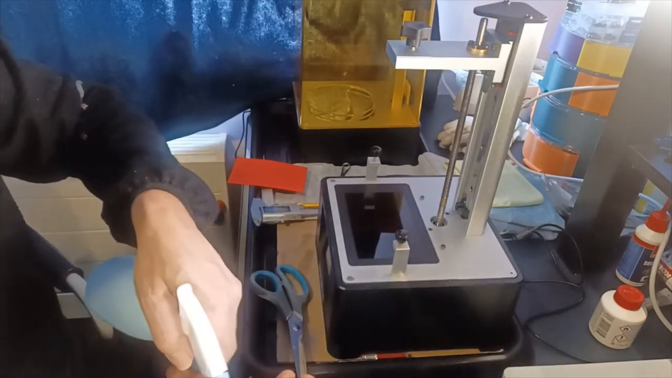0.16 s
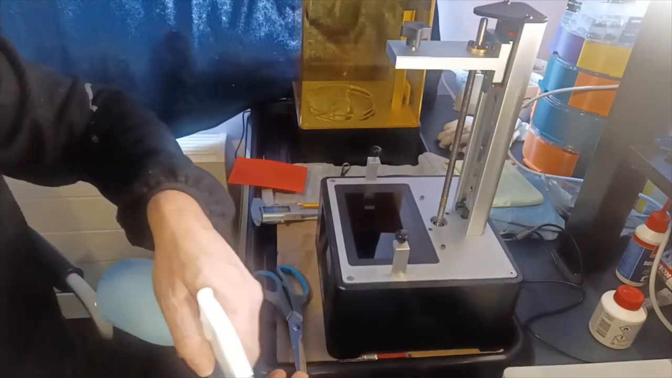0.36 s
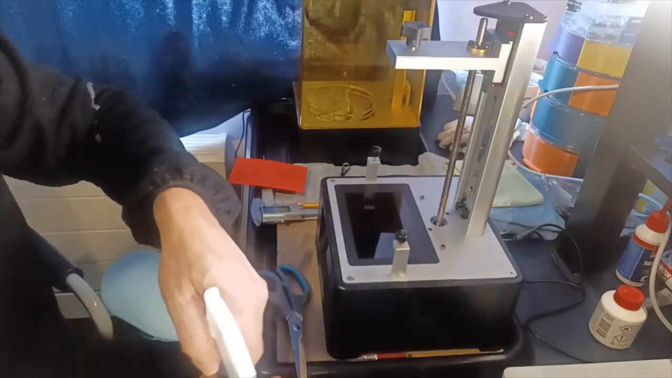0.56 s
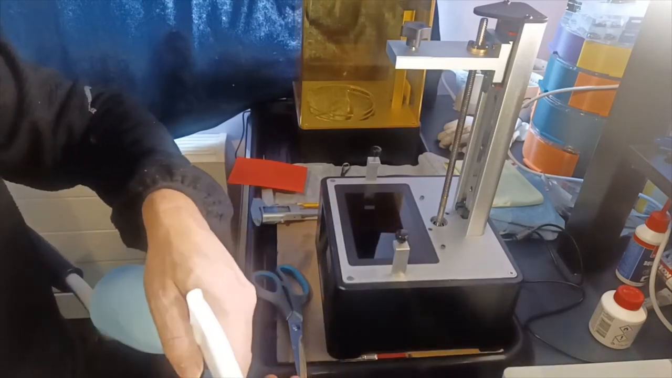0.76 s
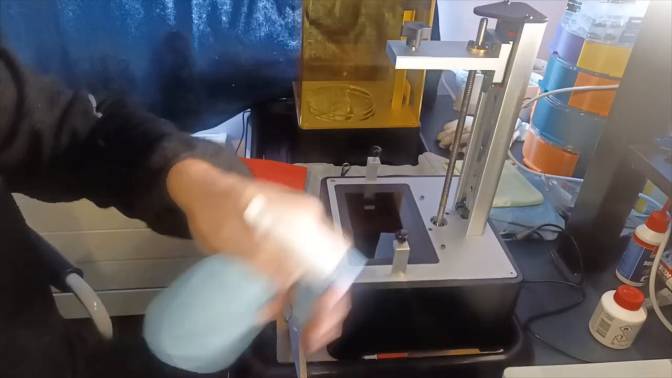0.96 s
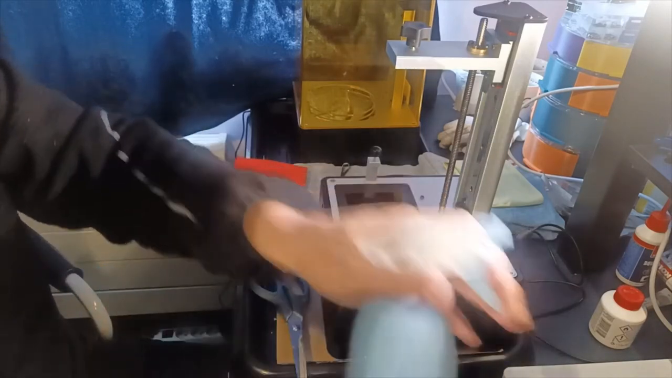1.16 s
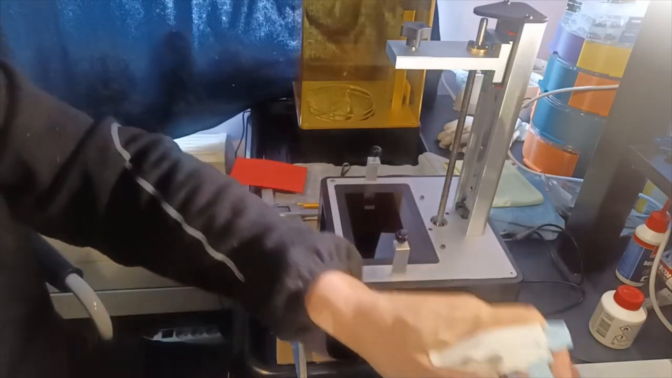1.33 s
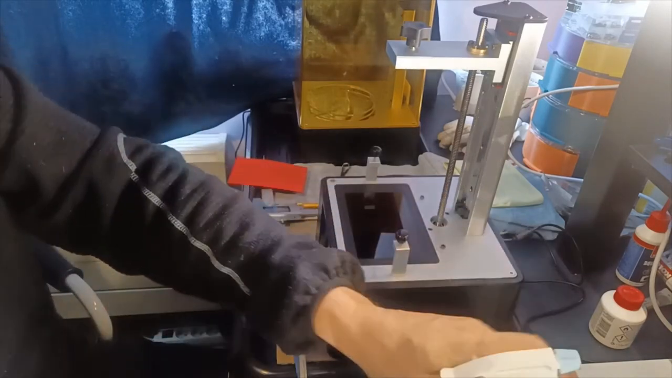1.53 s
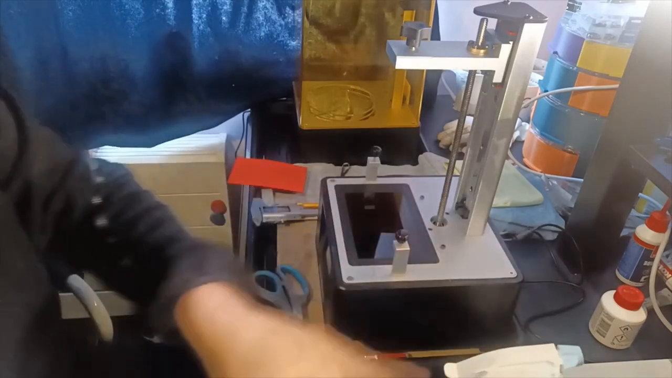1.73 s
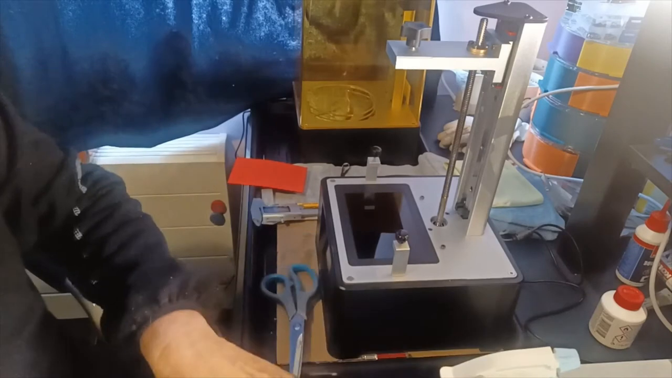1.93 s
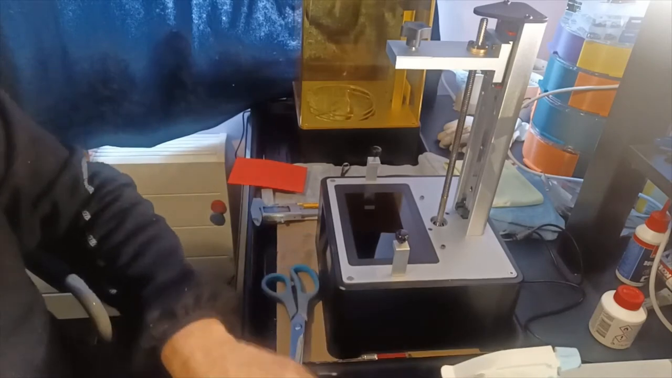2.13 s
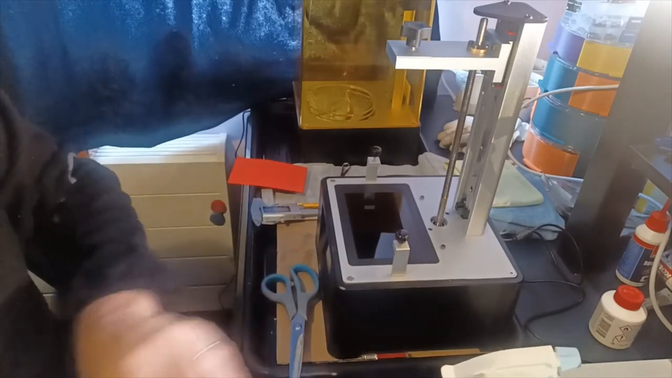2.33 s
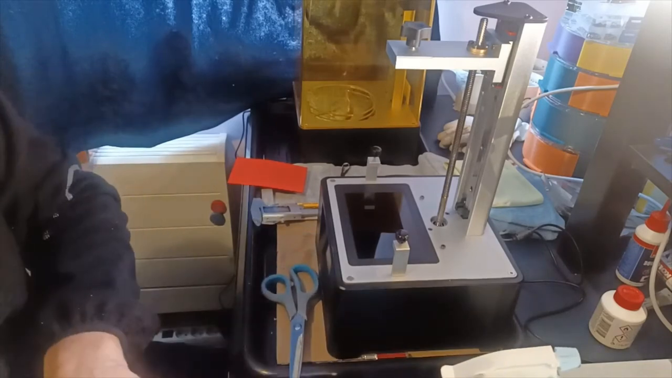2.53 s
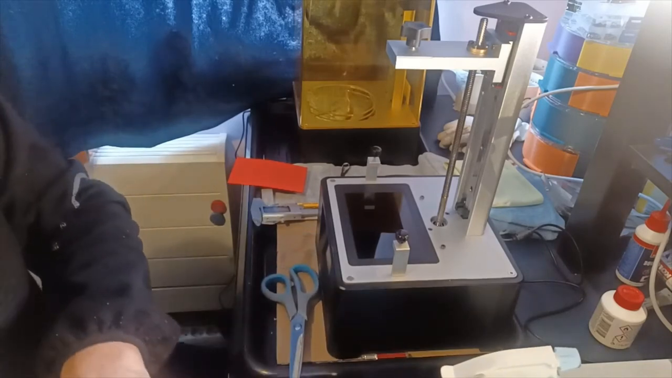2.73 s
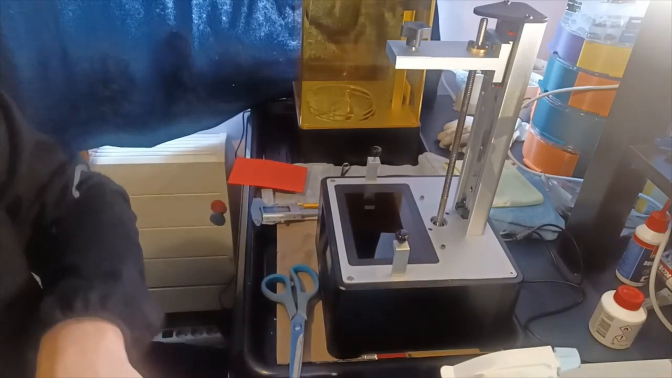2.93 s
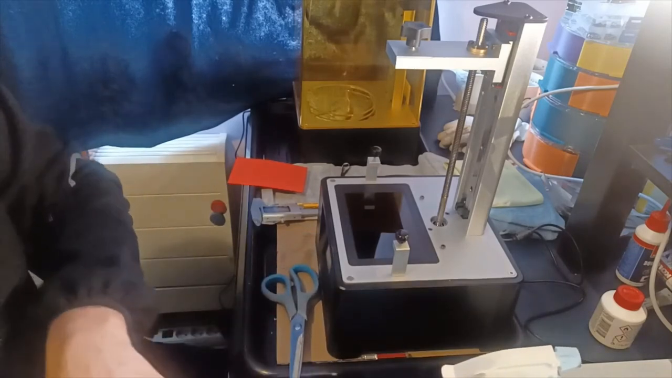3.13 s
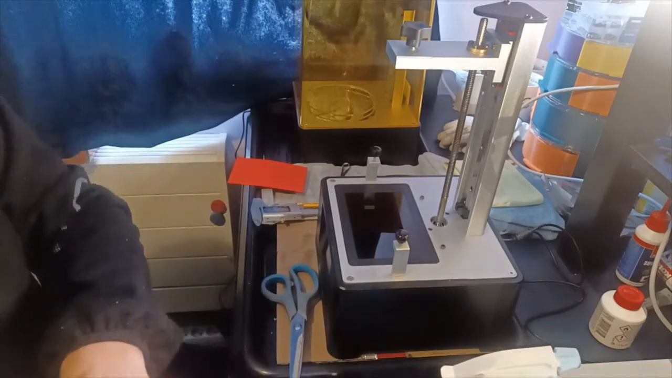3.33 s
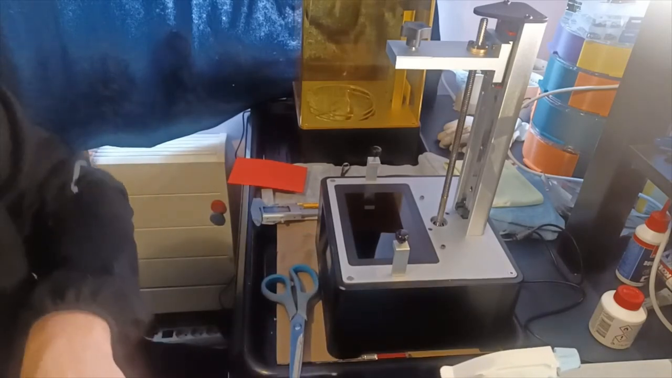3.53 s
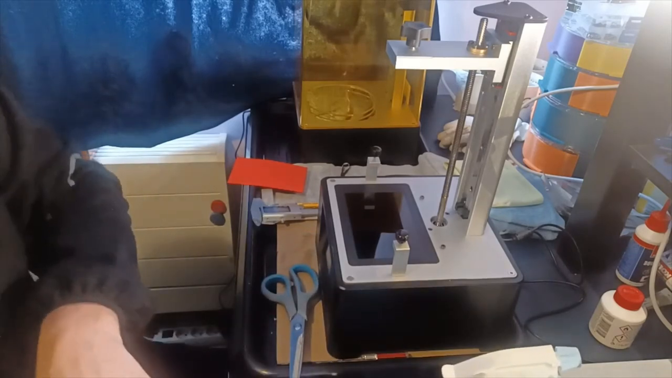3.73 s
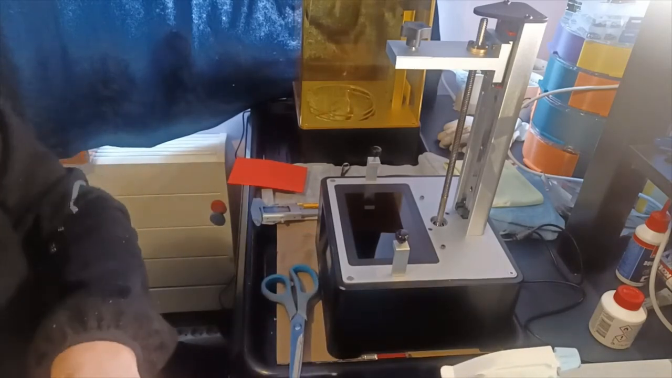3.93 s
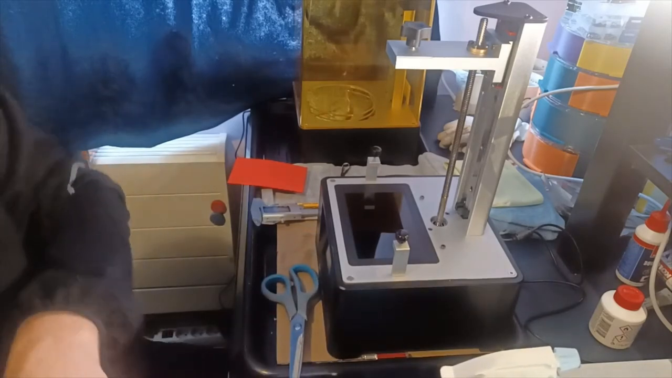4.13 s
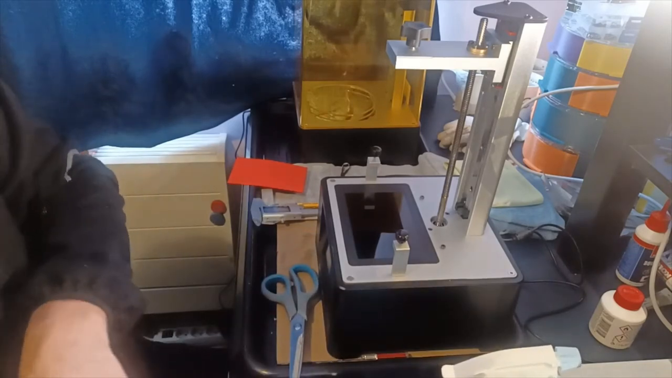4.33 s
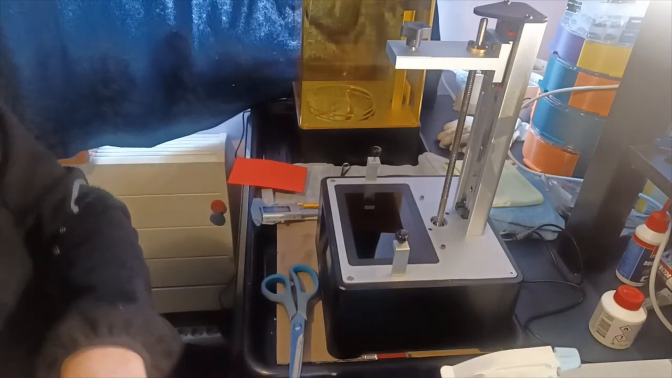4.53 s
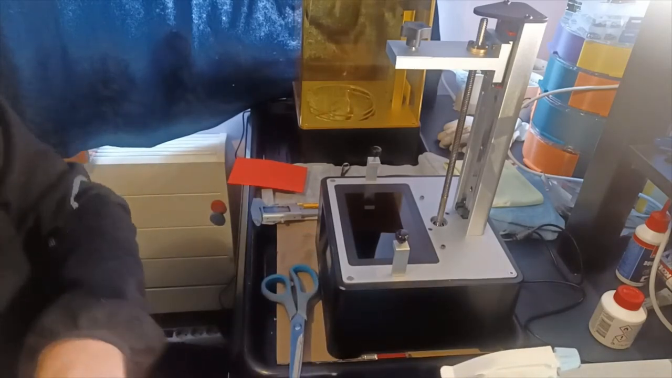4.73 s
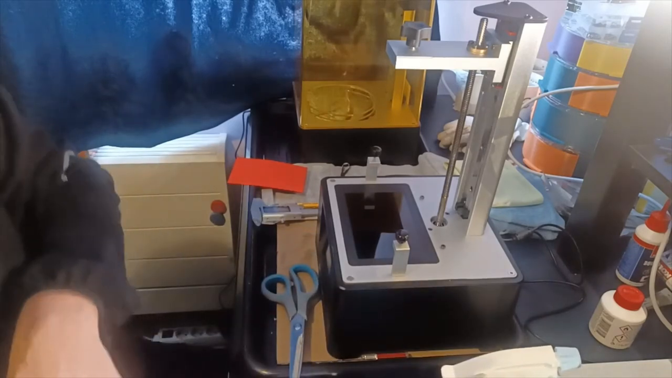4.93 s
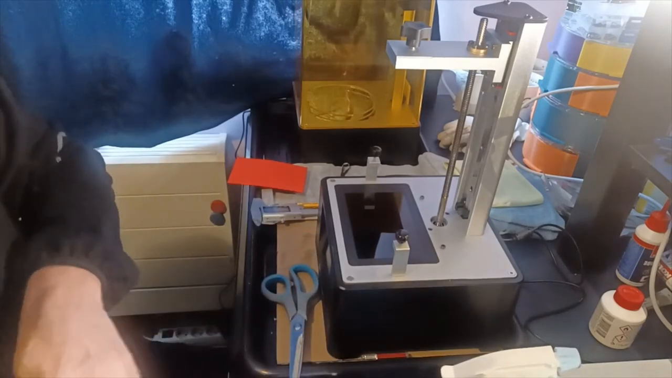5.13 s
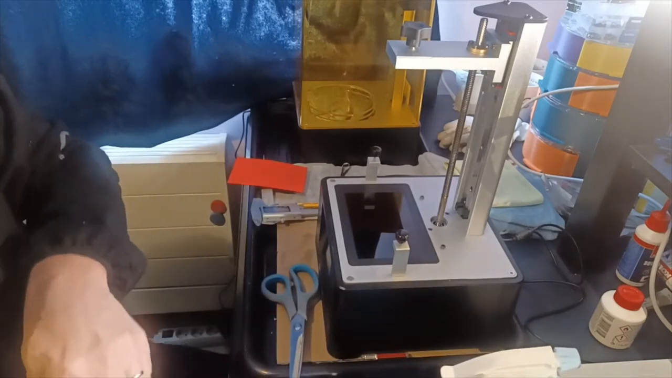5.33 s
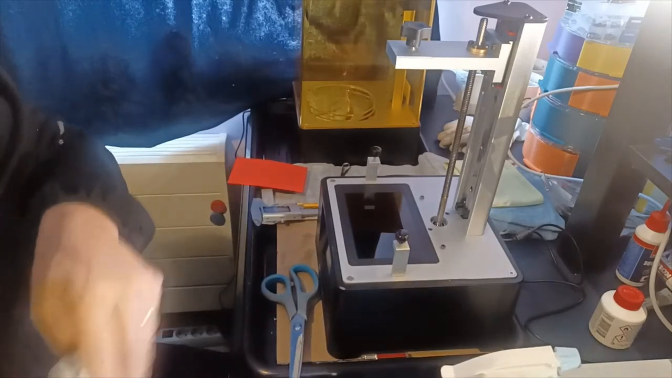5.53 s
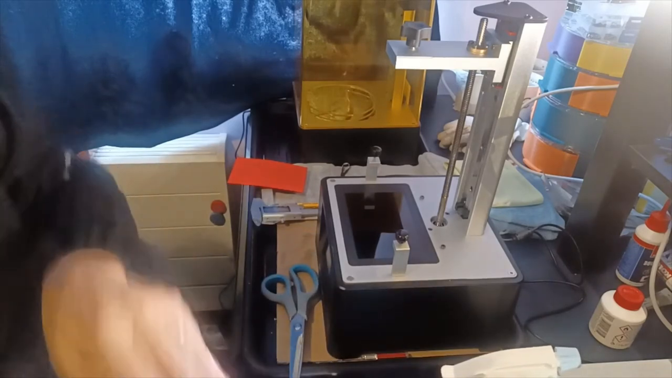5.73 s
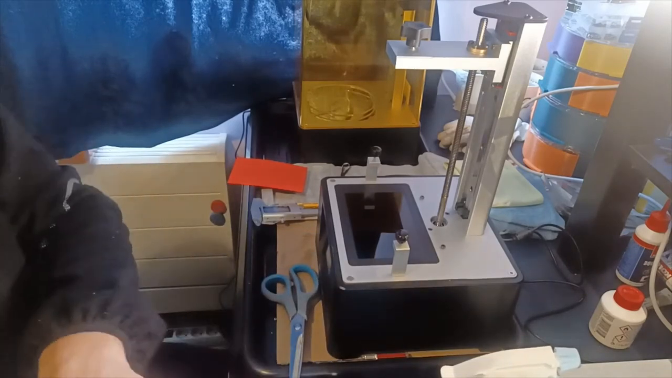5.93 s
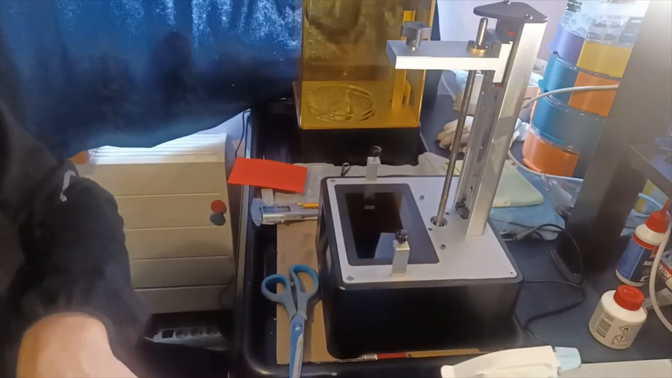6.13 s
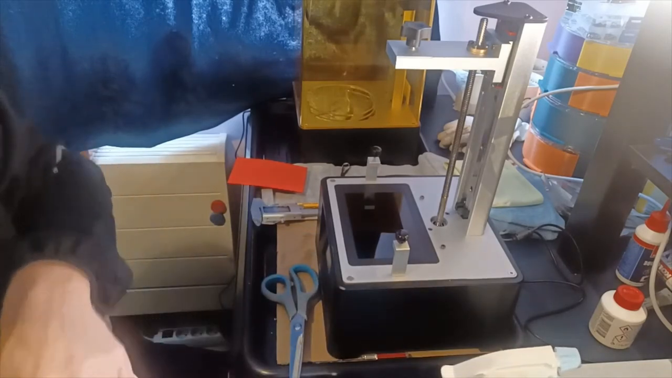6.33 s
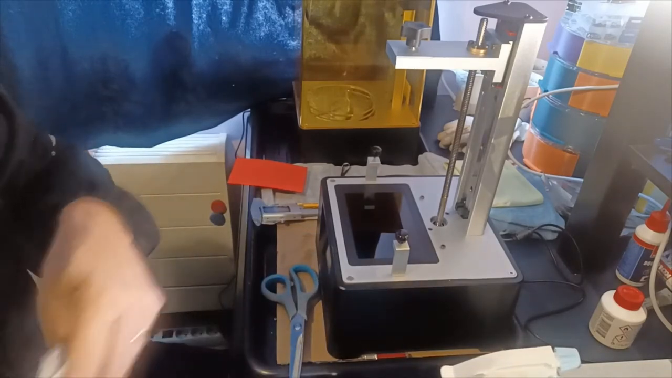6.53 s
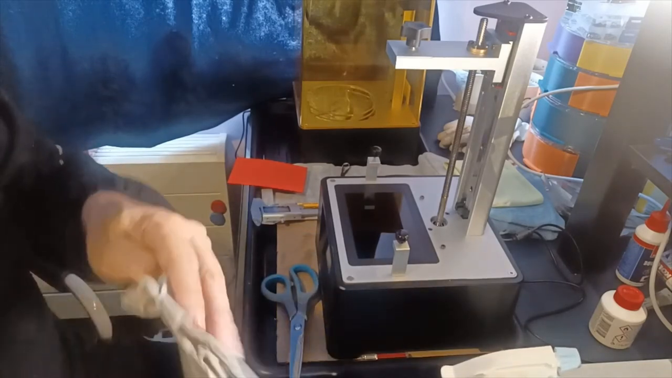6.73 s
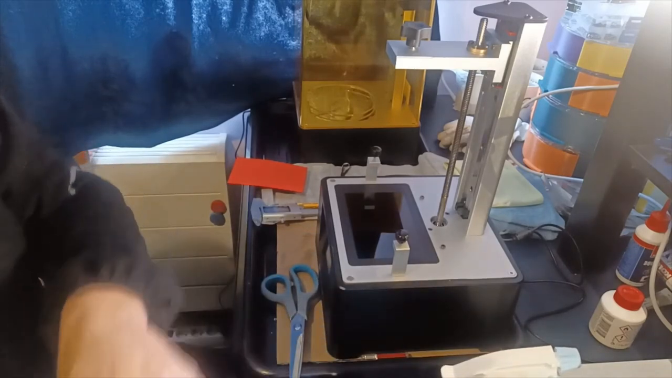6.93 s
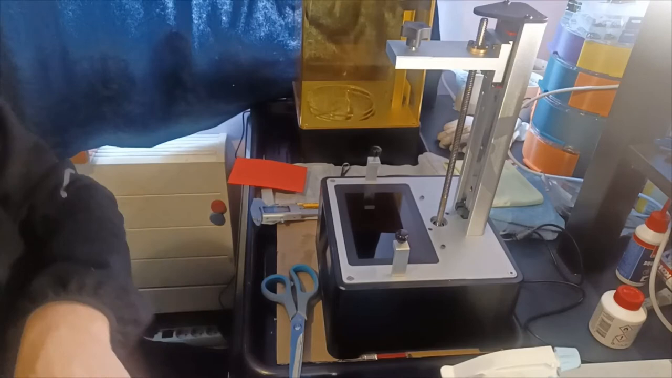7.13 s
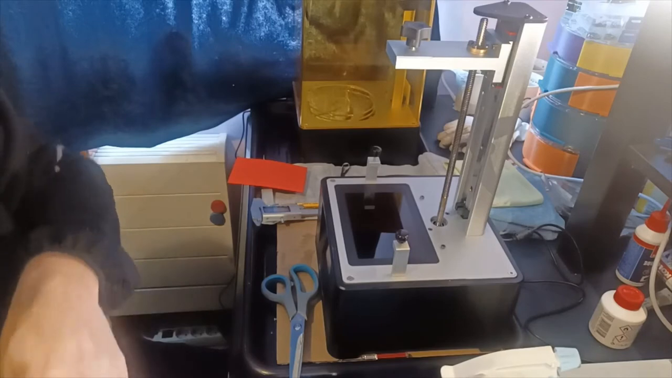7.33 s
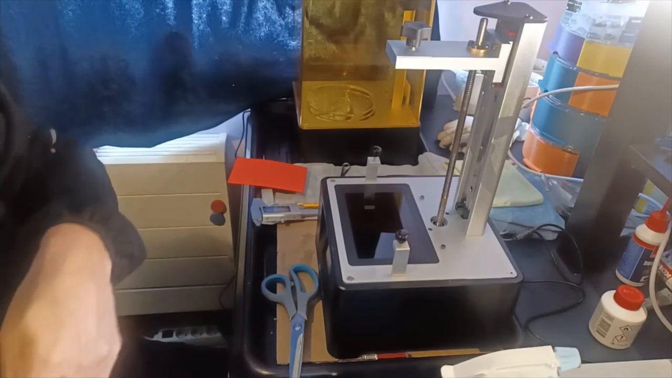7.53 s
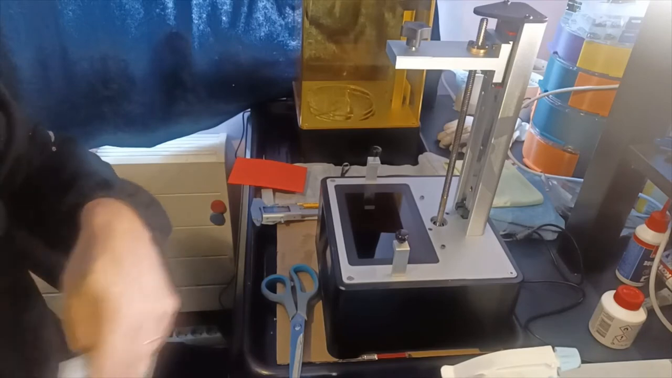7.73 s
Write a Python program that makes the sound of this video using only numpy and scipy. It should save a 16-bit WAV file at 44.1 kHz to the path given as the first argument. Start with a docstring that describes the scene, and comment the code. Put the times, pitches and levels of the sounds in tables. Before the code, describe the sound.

In a very quiet indoor workspace, a head-worn microphone picks up a brief squirt from a plastic spray bottle and a few trigger clicks. The loudest sound follows: the bottle knocks down on a hollow desk, wobbles and scuffs, with a light rattle of small objects. The rest is soft, uneven rustling of cloth being handled close by, dotted with light clicks and taps.

```python
"""A short grainy squeak and a few clicks: a spray bottle's trigger is squeezed and let go. The bottle lands on
a hollow desk and rocks; each blow rings desk and bottle and rattles loose things. Hands then work with cloth
just under a head-worn camera: slipping fibres rustle softly among small ticks and knocks. The room is very
quiet; two microphone ports hear it all."""
import sys
import numpy as np
from scipy import signal
from scipy.fft import rfft, irfft
from scipy.io import wavfile
from scipy.ndimage import uniform_filter1d

SR = 44100
rng = np.random.default_rng(int(sys.argv[2]) if len(sys.argv) > 2 else 0)


def persist_wave(psi):
    """Save psi, clipped to +-1, as 16-bit WAV."""
    counts = np.round(np.clip(psi, -1, 1) * 32767).astype(np.int16)
    wavfile.write(sys.argv[1], SR, np.atleast_2d(counts).T)


N = 342877
PORT_HZ, PORT_WIDTH_HZ = 7280, 1600  # resonance of the microphone ports
LAG_SAMPLES = 5  # the right port hears this much later


def undb(db):
    """Decibels to gain."""
    return 10 ** (np.asarray(db) / 20)


def unit(x):
    """Scale to rms 1."""
    return x / np.sqrt(np.mean(x ** 2))


def band(x, hz, width_hz):
    """Two-pole resonance, gain 1 at the centre."""
    return signal.lfilter(*signal.iirpeak(hz, hz / width_hz, fs=SR), x)


def track(rows, rest):
    """Columns of a breakpoint table at every sample; rest outside it."""
    times, *columns = np.transpose(rows)
    return [np.interp(np.arange(N) / SR, times, c, left=rest, right=rest) for c in columns]


def fall(t, t60):
    """Exponential decay of 60 dB in t60 seconds."""
    return np.exp(-np.log(1000) * t / t60)


def ring_modes(modes, t):
    """One dying sine for each row of pitch_hz, level_db, t60_s."""
    return np.array([undb(db) * fall(t, t60) * np.sin(2 * np.pi * hz * t) for hz, db, t60 in modes])


def port_noise(n, alike):
    """Stereo noise: the fraction alike of its power is common to both ports, later on the right."""
    shared, own = rng.standard_normal(n), rng.standard_normal((2, n))
    return np.sqrt(alike) * np.array([shared, np.roll(shared, LAG_SAMPLES)]) + np.sqrt(1 - alike) * own


def grains(rate_hz, spread_db):
    """Uneven gain of many tiny slips, rms 1."""
    step = int(SR / rate_hz)
    sizes = undb(spread_db * rng.exponential(size=N // step + 1))
    return unit(uniform_filter1d(np.repeat(sizes, step)[:N], step))


def add(out, start_s, piece):
    """Mix a piece in at start_s."""
    i = int(start_s * SR)
    out[..., i:i + piece.shape[-1]] += piece[..., :N - i]


def room_tone():
    """A faint steady bed of air and electronics; its rumble is partly shared by the ports."""
    curve_hz = [12, 30, 70, 140, 300, 700, 1600, 3200, 8000, 16000]
    curve_db = [0, -6.5, -16, -25, -24, -29, -31.5, -31, -37.5, -37]
    hz = np.maximum(np.fft.rfftfreq(N, 1 / SR), 1)
    colour = undb(np.interp(np.log(hz), np.log(curve_hz), curve_db))
    alike = 0.21 / (1 + (hz / 900) ** 2)
    shared, own = rfft(rng.standard_normal(N)), rfft(rng.standard_normal((2, N)))
    spectrum = colour * (np.sqrt(alike) * shared + np.sqrt(1 - alike) * own)
    return undb(-65) * unit(irfft(spectrum, N))


def stroke_envelopes():
    """Gains of hiss, weave and folds: each hand stroke rises, holds and fades; overlaps add in power."""
    # strokes of cloth and skin: full_level_at_s, rise_s, hold_s, fade_s, hiss_db, weave_db, folds_db
    strokes = [(0.061, 0.31, 0.15, 0.069, -69, -53, -55), (0.485, 0.034, 0.0088, 0.088, -47, -48.5, -50.5),
               (0.614, 0.059, 0.069, 0.13, -81, -71, -64), (0.912, 0.018, 0.014, 0.053, -80, -55.5, -77),
               (1.003, 0.06, .08, 0.26, -77, -75, -81), (1.202, 0.13, 0.15, 0.092, -73.5, -69, -78),
               (1.567, 0.071, 0.097, 0.17, -63.5, -65.5, -62.5),
               (1.95, 0.074, 0.047, 0.17, -52.5, -50, -70), (2.099, .1, 0.077, 0.16, -64, -64, -64),
               (2.356, 0.18, 0.041, 0.075, -71, -70.5, -72.5), (2.576, 0.15, 0.064, .15, -62, -61, -69.5),
               (2.7, .15, 0.036, 0.15, -56.5, -58, -60.5), (2.889, 0.069, 0.03, 0.17, -53, -55.5, -57.5),
               (3.045, 0.23, 0.043, 0.23, -56.5, -59.5, -68.5), (3.237, 0.15, 0.057, 0.35, -58, -59, -64.5),
               (3.447, 0.08, 0.026, 0.19, -48.5, -50.5, -54), (3.658, 0.27, 0.1, 0.18, -64, -73, -74.5),
               (3.889, 0.23, 0.046, 0.11, -55, -57.5, -63.5), (4.031, 0.04, 0.032, 0.32, -52.5, -52, -59.5),
               (4.19, 0.17, 0.046, 0.14, -57, -62, -68.5), (4.409, 0.13, 0.032, 0.5, -51, -53, -74),
               (4.53, 0.13, 0.075, 0.094, -51, -49, -49), (4.72, 0.14, 0.088, 0.28, -56.5, -57.5, -63.5),
               (4.956, 0.16, 0.078, 0.068, -58, -56.5, -59), (5.078, .08, .01, 0.035, -71, -57, -64),
               (5.22, 0.045, 0.022, 0.087, -66, -63, -54.5), (5.35, 0.087, .02, 0.11, -65, -63.5, -66),
               (5.914, 0.11, 0.11, 0.11, -72, -72, -60), (6.018, 0.14, 0.092, 0.096, -52, -54.5, -60.5),
               (6.209, 0.13, 0.064, 0.18, -62, -65.5, -67.5), (6.386, 0.051, 0.023, 0.083, -59, -58, -59.5),
               (7.068, 0.069, 0.018, 0.12, -56, -59, -61.5), (7.172, .1, 0.1, .12, -58.5, -61, -67),
               (7.375, 0.056, 0.017, 0.088, -57.5, -52.5, -57.5)]
    ramp_db = 20  # climbed over rise_s, lost over fade_s
    t, power = np.arange(N) / SR, 1e-14
    for full_s, rise_s, hold_s, fade_s, *levels_db in strokes:
        ramps_away = np.maximum((full_s - t) / rise_s, 0) + np.maximum((t - full_s - hold_s) / fade_s, 0)
        power = power + np.outer(undb(levels_db) ** 2, undb(-ramp_db * ramps_away) ** 2)
    return np.sqrt(power)


def cloth_rustle():
    """Fibres slip: fine hiss lifted by the ports, coarser weave and dull folds, over a low rumble."""
    hiss_gain, weave_gain, folds_gain = stroke_envelopes()
    friction = port_noise(N, alike=0.17) * grains(rate_hz=500, spread_db=1.34)
    sheen = unit(band(band(friction, 18100, 13000), 12500, 8600))
    hiss = unit(unit(band(friction, PORT_HZ, PORT_WIDTH_HZ)) + .5 * sheen)
    weave = unit(band(band(friction, 2600, 5900), 4630, 4900))
    crumple = grains(rate_hz=900, spread_db=1.2)
    folds = unit(band(port_noise(N, alike=0.29) * crumple, 540, 1400))
    rumble = unit(band(port_noise(N, alike=0.17), 44, 89.5))
    # low background rumble swells while the rustle is loud and sinks in the pauses
    loudness = uniform_filter1d(np.hypot(hiss_gain, folds_gain) / undb(-53), int(0.027 * SR))
    rumble_gain = np.hypot(undb(-71.5), undb(-64) * np.abs(loudness) ** 0.41)
    return hiss_gain * hiss + weave_gain * weave + folds_gain * folds + rumble_gain * rumble


def ticks():
    """A hard edge rings a small hollow thing; dense nearby reflections follow and die quickly."""
    # small ticks and knocks: start_s, body_db, pitch_hz, sharpness_q, upper_hz, upper_db,
    # treble_db, thump_db, tail_db (relative to the ping), pan_db (left minus right)
    hits = [(0.059, -38.5, 775, 1.5, 2560, -39, -32, -49, -24, -2),
            (0.4555, -36.5, 1540, 1.3, 4270, -48, -21, -44.5, -22.5, 2),
            (0.465, -36, 1440, 3.5, 4370, -50, -27.5, -39, -17.5, -1.5),
            (0.621, -52, 664, 2.5, 2670, -50, -65, -51, -17.5, -1),
            (0.689, -50, 2260, 0.92, 3440, -61, -56.5, -55.5, -16, -2),
            (0.902, -57, 1740, 3.4, 3190, -78, -53.5, -71, -14.5, 3),
            (0.91, -45, 1670, 3.8, 2710, -62, -64, -59, -18.5, 2),
            (0.92, -66, 1740, 2.0, 3120, -58, -58, -64, -21, -3),
            (1.009, -80, 630, 2.0, 3530, -69, -58.5, -78, -16, -1),
            (1.242, -54, 1140, 1, 3600, -53.5, -85, -79, -20.5, -1),
            (1.564, -47, 630, 3.2, 3720, -35, -35.5, -56, -22, -1),
            (1.579, -64, 514, 2.0, 4200, -49, -64, -45, -10.5, -2),
            (2.8764, -28.5, 1230, 0.98, 2820, -35.5, -47, -47, -20, -1),
            (2.988, -38.5, 1400, 2.6, 2300, -43, -57, -53, -17, 1),
            (3.017, -30, 1530, 1.2, 2650, -30.5, -45, -64, -21, -0.5),
            (3.03, -67, 1600, 2.2, 2800, -37.5, -52, -47, -15.5, 0),
            (3.421, -24, 1400, 1.1, 4070, -20.5, -24, -70, -21.5, -1),
            (3.545, -39.5, 940, 0.7, 2400, -52, -55, -65, -21, 2),
            (3.881, -36.5, 1040, 0.98, 2660, -39, -61, -61, -17.5, 3),
            (4.138, -40, 610, 1.1, 2360, -38, -48, -61, -20, 1),
            (4.39, -54, 2160, 2.0, 3400, -67, -44, -57, -14.5, 0.5),
            (4.416, -60, 2000, 2.0, 3400, -48, -38, -63, -24, 3),
            (4.579, -25, 1235, 4.2, 3660, -15.5, -26.5, -27.5, -22, 0.5),
            (4.807, -46, 977, 1.2, 3100, -59, -65, -72.5, -25, 0.5),
            (4.921, -51, 1220, 2.9, 2570, -47, -49, -54.5, -19, 3),
            (4.951, -40.5, 990, 2.2, 3540, -50, -55, -69, -23, -1),
            (4.989, -47, 1710, 2.9, 2330, -67, -57, -53, -12, 0),
            (5.077, -56.5, 1900, 1.8, 3040, -48.5, -55, -61.5, -11, 2),
            (5.223, -37.5, 1090, 0.96, 2430, -43, -50, -46, -18.5, 2),
            (5.262, -64, 720, 2.2, 2760, -67, -71, -43.5, -20.5, 3),
            (5.349, -62, 894, 2.8, 2720, -68, -58.5, -70, -10.5, 5),
            (5.935, -36, 1220, 1.3, 2620, -38.5, -53, -69, -22, 0.5),
            (5.992, -35.5, 1040, 2.3, 2720, -29, -48, -75, -16, -0.5),
            (6.196, -52, 1060, 5.3, 2360, -56, -64, -47, -15.5, -2),
            (6.226, -52, 1020, 2.7, 2570, -54, -69, -78, -13.5, -2),
            (6.372, -51.5, 1170, 1.8, 2740, -50, -59, -56, -12, 1),
            (7.148, -25.5, 1110, 0.8, 2350, -38, -67, -61, -23.5, -2),
            (7.257, -49.5, 1030, 2.3, 3760, -47, -59, -66, -26, 3)]
    out, t = np.zeros((2, N)), np.arange(SR // 3) / SR
    edge = np.zeros((2, len(t)))
    edge[0, 0] = edge[1, LAG_SAMPLES] = 1
    # a burst of chatter, then a tail that is cut short
    tail_shape = (1 + 2.64 * fall(t, 0.091)) * fall(t, 0.47) * np.exp(-(t / 0.063) ** 4)
    for start_s, body_db, pitch_hz, q, upper_hz, upper_db, treble_db, thump_db, tail_db, pan_db in hits:
        resonances = [(body_db, pitch_hz, pitch_hz / q), (upper_db, upper_hz, 2000),
                      (treble_db, PORT_HZ, PORT_WIDTH_HZ), (treble_db - 6.5, 10500, 7000),
                      (treble_db - 4, 5600, 2000), (thump_db, 400, 450)]
        pan = undb([[pan_db / 2], [-pan_db / 2]])
        noise = port_noise(len(t), alike=0.21)
        for db, hz, width_hz in resonances:
            ping = band(band(band(edge, hz, width_hz), hz, 2 * width_hz), hz, 2 * width_hz)
            tail = undb(tail_db) * tail_shape * unit(band(band(noise, hz, width_hz), hz, 2 * width_hz))
            add(out, start_s, undb(db) * pan * (ping / np.abs(ping).max() + tail))
    return out


def chink():
    """A tiny hard part rings once as the bottle swings."""
    # modes of the part: pitch_hz, level_db, t60_s
    modes = [(3610, -58, 0.052), (5160, -60, .04)]
    out, t = np.zeros((2, N)), np.arange(SR // 10) / SR
    add(out, 1.288, ring_modes(modes, t).sum(axis=0))
    return out


def tinkle():
    """A small metal part on the desk shivers on after the landing: two close modes that beat."""
    # modes of the metal: pitch_hz, gain_db
    modes = [(1680, -58), (1722, -62)]
    out, t = np.zeros((2, N)), np.arange(SR // 2) / SR
    swell = (1 - fall(t, .3)) * fall(t, .7) * np.exp(-(t / .2) ** 4)
    shimmer = sum(undb(db) * np.sin(2 * np.pi * hz * t) for hz, db in modes)
    add(out, 1.57, swell * shimmer)
    return out


def trigger():
    """Each jolt of the trigger rings the hollow bottle."""
    # modes of the bottle in the hand: pitch_hz, relative_db, t60_s
    bottle_modes = [(367, -9, .12), (434, -3, 0.17), (630, -6, .15), (1378, -1.5, 0.09), (1820, -6, 0.054)]
    # trigger jolts: start_s, gain_db
    jolts = [(0.058, -56), (0.456, -54), (0.465, -48), (0.49, -56), (0.62, -60), (0.69, -62)]
    out, t = np.zeros((2, N)), np.arange(SR // 4) / SR
    ring = ring_modes(bottle_modes, t).sum(axis=0)
    for start_s, gain_db in jolts:
        add(out, start_s, undb(gain_db) * np.array([ring, np.roll(ring, LAG_SAMPLES)]))
    return out


def squeak():
    """The trigger mechanism squeaks and scrapes as it is squeezed: a grainy hiss whose resonance slides."""
    # course of the squeeze: time_s, gain_db, centre_hz, treble_gain_db
    squeeze = [(0.0, -60, 2640, 4), (0.01, -54.5, 2750, 5), (0.052, -65, 2650, -1),
               (0.056, -64.5, 2660, 23.5), (0.082, -42.5, 2900, 4.5), (0.166, -45, 2610, -0.5),
               (0.212, -51.5, 2420, -16), (0.3, -87, 2450, -2)]
    gain_db, centre_hz, treble_gain_db = track(squeeze, rest=-120)
    sputter = port_noise(N, alike=0.48) * grains(rate_hz=530, spread_db=1.95)
    # the slide is a crossfade along a row of bands
    slide = sum(np.exp(-((centre_hz - hz) / 350) ** 2) * unit(band(band(sputter, hz, 780), hz, 780))
                for hz in range(1800, 3700, 300))
    body = 0.13 * unit(band(sputter, 900, 1200)) + 0.15 * unit(band(sputter, 367, 80))
    treble = unit(band(sputter, PORT_HZ, PORT_WIDTH_HZ))
    treble += 0.32 * unit(band(sputter, 12000, 7000)) + 0.42 * unit(band(sputter, 5100, 940))
    return undb(gain_db) * (1.33 * slide + body + undb(treble_gain_db) * treble)


def bottle_on_desk():
    """Half-sine pushes and a dragging base ring the desk and bottle; loose things rattle along."""
    # the bottle strikes the desk: start_s, strength_db, contact_ms, frame_sway_db,
    # place (0-1 across the top), rattle_db, rattle_t60_s
    blows = [(1.478, -13.5, 1.36, -5, .3, -31.5, 0.092), (1.49, -15.5, 2.05, -10, 0.4, -51, 0.12),
             (1.502, -18.5, 2.04, -11, 0.18, -48, 0.2), (1.518, -16.5, 3, -6, 0.34, -46.5, 0.21),
             (1.553, -15.5, 2.5, -12, 0.43, -64, 0.1), (1.658, -26.5, 3.5, -2.5, .3, -63, 0.21),
             (1.741, -34.5, 4.5, -8, 0.29, -75, 0.21), (1.892, -24, 4.4, -14, 0.5, -80, 0.45),
             (1.962, -26, 1.4, 2, 0.6, -30, 0.12), (2.01, -27, 0.48, -4, .45, -39.5, 0.18),
             (2.067, -31.5, 5, 10.5, 0.07, -66, 0.088), (2.111, -33.5, 1.15, 7.5, .4, -51, 0.17),
             (2.151, -25, 4.5, 0, 0.32, -71, 0.22)]
    # modes of desk frame, top and bottle: pitch_hz, relative_db, t60_s
    desk_modes = [(65.1, -10, 0.2), (77.6, -12, 0.53), (118, -20, 0.3), (128.1, -1, 0.31),
                  (185.6, -11.5, 0.11), (220, -15.5, 0.0764), (270.6, -13, 0.18), (311, -14, 0.12),
                  (363, -9, 0.11), (428, -20, 0.2), (470, -2, 0.035), (578, -9.5, 0.1), (619, -18.5, 0.11),
                  (653, -16, 0.21), (697, -18.5, 0.098), (903, -12, 0.079), (983, -24.5, 0.059),
                  (1122, -24, 0.118), (1314, -20.5, 0.13), (1440, -23, 0.081), (1593, -22.5, 0.1),
                  (1966, -45, 0.032), (2400, -23, 0.055)]
    # two drags of the base over the top, each a curve of: time_s, relative_db
    drags = [
        [(1.47, -125), (1.478, -25), (1.492, -20.5), (1.604, -53.5), (1.8, -66.5)],
        [(1.87, -65), (1.9, -36.5), (1.956, -35.5), (1.964, -25.5), (2.026, -27.5), (2.082, -44), (2.11, -35),
         (2.236, -69), (2.3, -86)],
    ]
    ring, rattle, t = np.zeros((2, N)), np.zeros((2, N)), np.arange(SR // 2) / SR
    modes = ring_modes(desk_modes, t)
    mode_hz, order = np.array(desk_modes)[:, 0], np.arange(len(desk_modes))
    is_frame, is_upper = mode_hz < 100, mode_hz > 800
    pan = undb(np.outer([-1, 1], 1.2 + 1.2 * np.cos(9.8 * order)))  # modes lean right by varied amounts
    for start_s, strength_db, contact_ms, sway_db, place, rattle_db, rattle_t60_s in blows:
        push = np.sin(np.pi * np.clip(t[None, :400] * 1000 / contact_ms, 0, 1))
        # each mode moves more or less at the place that is struck
        weights = pan * np.where(is_frame, undb(sway_db), 1 + .5 * np.cos(np.pi * place * order))
        add(ring, start_s, -undb(strength_db) * signal.fftconvolve(push / push.sum(), weights @ modes))
        # the hard rim of the base wakes the upper modes
        add(ring, start_s, undb(rattle_db + 12.5) * (weights * is_upper) @ modes)
        clatter = unit(band(band(port_noise(len(t), alike=0.14), 2000, 2900), 2034, 4720))
        add(rattle, start_s, undb(rattle_db) * fall(t, rattle_t60_s) * clatter)
    drag = sum(undb(track(curve, rest=-120)[0]) for curve in drags)
    friction = undb(-30.5) * drag[None] * rng.standard_normal(N)
    ring += signal.fftconvolve(friction, (pan * ~is_frame) @ modes)[:, :N]
    cutoff_s = 2.202  # the desk's ring is damped from here, as a hand presses the bottle down
    ring *= fall(np.maximum(np.arange(N) / SR - cutoff_s, 0), t60=0.42)
    # a high-pass removes the deepest bass from the desk's ring
    ring = signal.sosfilt(signal.butter(6, 60, "high", fs=SR, output="sos"), ring)
    scuff = undb(-12) * drag * unit(band(band(port_noise(N, alike=.3), 650, 1100), 650, 1100))
    return ring + rattle + scuff


def scene():
    """All sources as they reach the two ports."""
    landing = bottle_on_desk() + tinkle()
    return landing + chink() + ticks() + trigger() + squeak() + cloth_rustle() + room_tone()


def record(dry):
    """The more covered left port dulls the treble; the camera cuts the top and adds a small offset."""
    left_cutoff_hz, top_hz, dc_offset = 13000, 16000, -.0007
    left = signal.lfilter(*signal.butter(2, left_cutoff_hz, fs=SR), dry[0])
    top_cut = signal.ellip(10, .2, 80, top_hz, fs=SR, output="sos")
    return signal.sosfilt(top_cut, [left, dry[1]]) + dc_offset


dry = scene()
out = record(dry)
persist_wave(out)
```